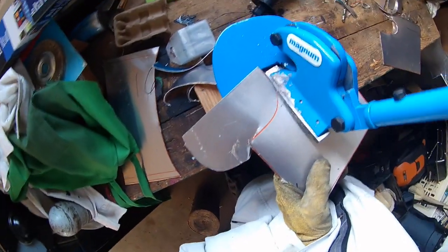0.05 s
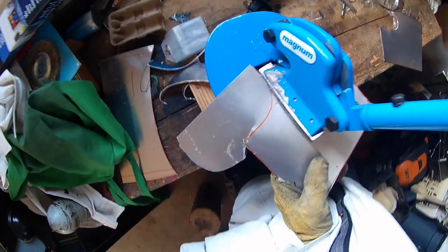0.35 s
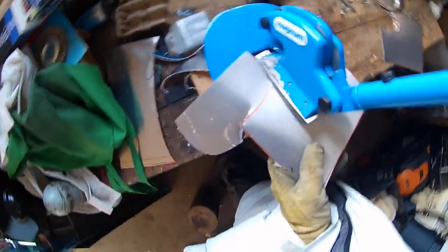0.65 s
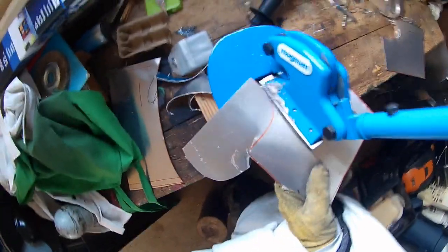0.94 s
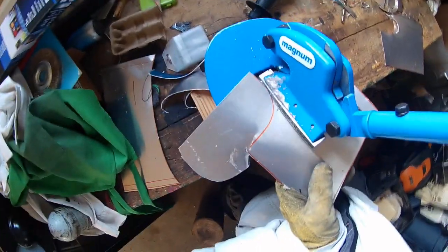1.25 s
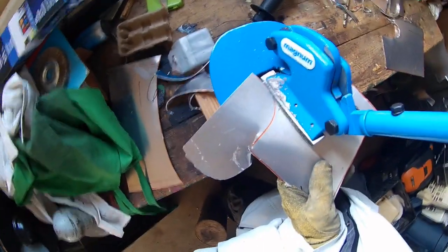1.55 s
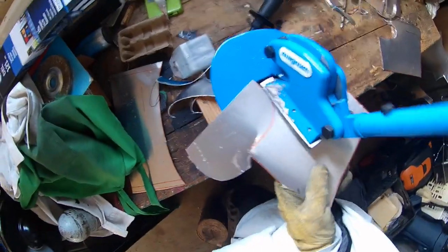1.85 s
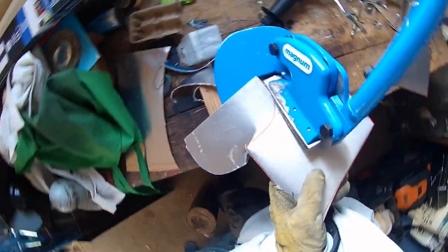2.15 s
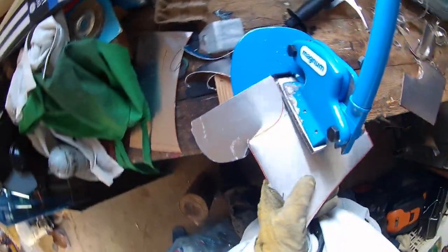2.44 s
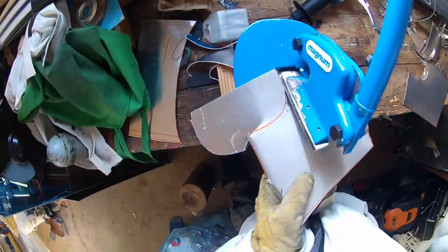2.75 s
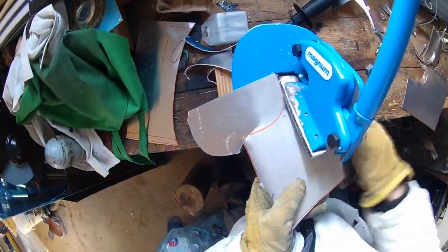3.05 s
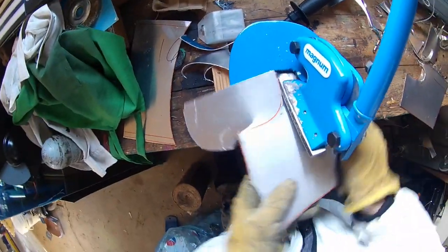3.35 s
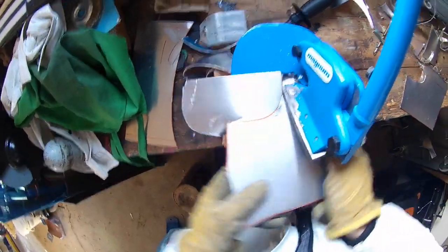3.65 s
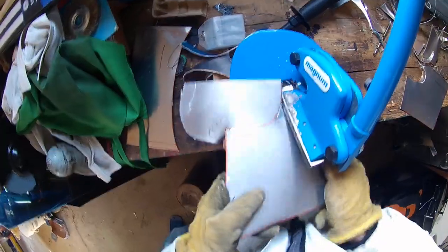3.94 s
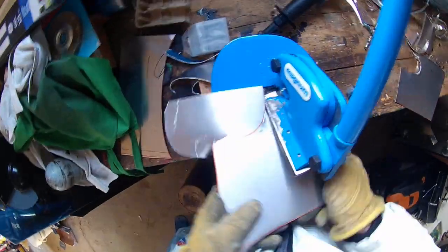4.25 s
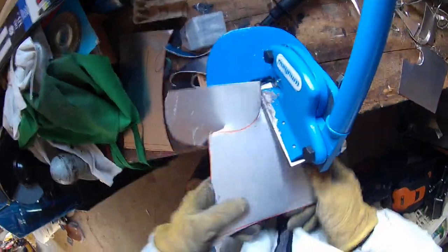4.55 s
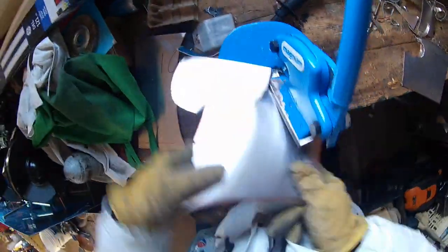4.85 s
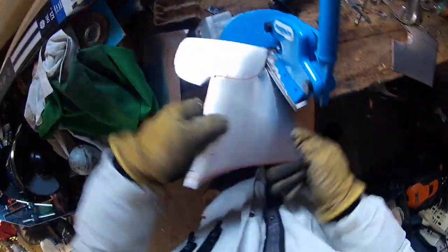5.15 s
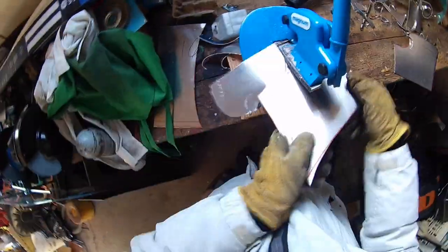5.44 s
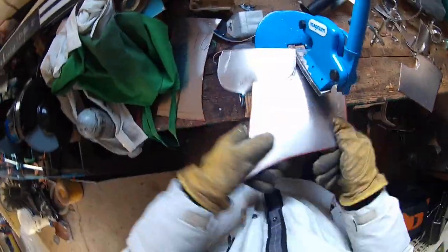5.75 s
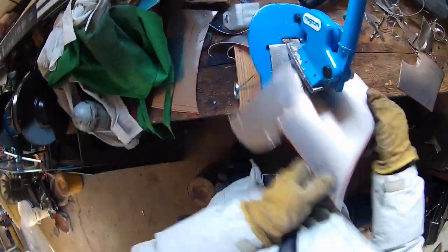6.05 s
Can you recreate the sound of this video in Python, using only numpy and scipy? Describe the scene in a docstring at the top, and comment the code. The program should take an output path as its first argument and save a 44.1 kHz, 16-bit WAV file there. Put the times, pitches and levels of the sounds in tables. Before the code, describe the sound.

A lever shear cuts sheet metal with one loud ringing clack, then the sheet clicks and scrapes lightly against the blades.

```python
"""A lever shear, mounted on a bench, cuts a steel sheet in a small workshop with a low rumble and hiss.
First the lever's strokes make the bench thud, and at 0.5 s the blade bites with a faint crack and scrape.
At about 1.25 s the metal parts with one loud clack that rings the shear's frame and jolts the bench.
From 1.8 s on, the sheet is turned by hand and clicks and scrapes against the blades.
Early among these clicks, at 2 s, the lever thuds the bench once more."""
import sys
import numpy as np
from scipy import signal
from scipy.fft import rfft, irfft
from scipy.io import wavfile

SR = 44100
rng = np.random.default_rng(int(sys.argv[2]) if len(sys.argv) > 2 else 0)


def generate_wav(sig):
    """Save sig (samples, or channels by samples) to the path in sys.argv[1] as 16-bit PCM at SR."""
    pcm = np.round(np.clip(np.atleast_2d(sig).T, -1, 1) * 32767).astype(np.int16)
    wavfile.write(sys.argv[1], SR, pcm)


N = 276948
AGE = np.arange(SR // 3) / SR   # seconds since a sound began

# steady noise of the workshop: pitch_hz, level_db
HISS_SPECTRUM = [(53, -8.5), (90, -4), (114, -8), (142, -8), (296, -8.5), (591, -14), (644, -14),
                 (1060, -18), (1210, -17), (1340, -19), (4410, -27), (12200, -31.5), (15800, -34)]
# deep rumble of body movement: pitch_hz, level_db
RUMBLE_SPECTRUM = [(2, -25), (8, -1.5), (14, -2), (25, -17), (40, -19), (60, -27), (100, -27),
                   (200, -37), (1000, -100)]
# the lever pushes on the bench: start_s, knock_db, pitch_hz, sway_db
LEVER_STROKES = [(0.143, -27, 71.4, -37), (0.490, -21, 95, -9), (0.812, -31.5, 64.5, -45),
                 (0.864, -26.5, 60, -15.5), (1.997, -33, 88, -22)]
# the bench springs back after the cut: pitch_hz, level_db, swell_s
BENCH_RECOIL = [(86, -12, .015), (296, -34, 0.015)]
# the blade breaks through the metal: start_s, level_db, dull_above_hz, grind_s
BLADE_BREAKS = [(0.494, -45, 4000, .01), (0.507, -50, 6960, 0.014), (0.527, -54, 7000, .018),
                (1.2332, -42, 5000, 0.013), (1.2473, -24, 4470, 0.0099), (1.2543, -26, 4830, 0.017),
                (1.268, -35, 3800, 0.025)]
# short tones of blade and sheet that give a crack its body: pitch_hz, level_db, ring_s
CRACK_TONES = [(490, -19, 0.04), (760, -18, 0.033), (920, -7, 0.013), (1150, 2, 0.047), (1295, 2.5, 0.073),
               (1670, -4, 0.034), (1890, -9, .03), (2300, -9, 0.021), (2590, -9, 0.052), (3230, -29, 0.018),
               (3770, -28, 0.015), (4930, -23, 0.038)]
# grit of the parting metal: pitch_hz, level_db
GRIT_SPECTRUM = [(150, -16), (300, -7), (450, -6.5), (850, 1), (1280, 11), (1900, -4), (2700, -9.5),
                 (4000, -20.5), (5200, -36), (7000, -40), (15000, -38)]
# tones of the shear's frame with the sheet clamped in it: pitch_hz, level_db, ring_s
FRAME_TONES = [(660, -19, 0.17), (1071, 8, 0.13), (1109, -12, 0.14), (1115, -2, 0.058), (1316, 5, 0.15),
               (1374, 1, 0.28), (1560, -15, .18), (1561, -15, 0.18), (1655, -4, 0.12), (1790, -7, 0.16),
               (1926, -7, 0.14), (1800, -13, 0.28), (2130, -7, 0.16), (2450, -15, 0.24), (2480, -15, 0.11),
               (2770, -25, 0.092), (3420, -13, 0.15), (5130, -28, .08)]
# hum of the sheet after a crack: pitch_hz, level_db
HUM_SPECTRUM = [(200, 3), (800, -10.5), (1150, -9), (1500, -0.5), (2000, -4.5), (2600, -5),
                (4000, -4), (9000, -21)]
# an edge drags along the blade: start_s, level_db, length_s, dull_above_hz, favoured_hz
EDGE_DRAGS = [(0.501, -52.5, .022, 6040, 2577), (2.359, -47.5, .026, 5000, 1377),
              (2.384, -40, 0.019, 2500, 768), (2.403, -48.5, 0.027, 3200, 2577),
              (3.346, -57, 0.062, 4500, 2800), (4.893, -52, 0.019, 2500, 1580),
              (6.038, -44.5, 0.019, 6000, 3700), (6.077, -41.5, 0.031, 3520, 940),
              (6.098, -42, 0.03, 11000, 1830), (6.253, -43, 0.024, 4000, 2577)]
# tick of the sheet's edge: pitch_hz, level_db
TICK_SPECTRUM = [(200, -2), (450, -1.5), (800, 8), (1600, 6.5), (2150, -1.5), (3000, -2), (5000, -2),
                 (6500, -7.5), (8000, -13), (10000, -8), (11500, -21), (15000, -20)]
# tones of the loose sheet: pitch_hz, level_db, ring_s
SHEET_TONES = [(312, -1.5, 0.085), (623, 0, 0.069), (766, 1, 0.069), (867, -16, 0.089), (950, -12.5, 0.037),
               (1085, 2.5, 0.032), (1237, -0.5, 0.073), (1362, 6, 0.051), (1610, -2, 0.08),
               (1677, 2, 0.044), (1684, -5, 0.063), (1833, 1.5, 0.061), (1952, -5, 0.06),
               (2360, -11, 0.062), (2430, -1.5, 0.044), (2586, 0, 0.05), (2780, -6, 0.031),
               (3136, -4, 0.038), (3460, -1.5, 0.029), (3680, -6, 0.037), (4440, -27, 0.075),
               (4580, -9, 0.073), (5050, -5.5, 0.039), (5680, -6.5, 0.029), (6315, -7.5, 0.033),
               (7040, -9, 0.023), (9700, -3, 0.046), (10200, -11, 0.041)]
# the loose sheet touches the blades: start_s, level_db, hollow_db, bright_db, sizzle_db, middle_hz, high_hz
# (hollow, bright and sizzle adjust the bands below; the spot touched favours the two pitches)
SHEET_TAPS = [(1.8404, -40.5, -16, -19, -26, 1310, 3420), (1.923, -43, -3.5, -16, -20, 1180, 3530),
              (1.9929, -49, 1.5, -17, -15, 1190, 3810), (2.371, -42, -3, -5.5, -14, 1350, 4590),
              (2.3994, -35, -4.5, -2.5, -27, 1040, 2740), (2.4159, -42, -5, -5, -22, 1140, 2760),
              (2.8049, -31.5, -6, -10, -32, 1724, 3140), (2.8774, -45.5, -3, -9, -17, 1340, 2800),
              (3.1766, -39, -4.5, -7.5, -23, 1630, 2760), (3.342, -39, -2, -10, -24, 1370, 3050),
              (3.6509, -43, -4.5, -0.5, -17, 1400, 4900), (4.019, -45, -6, -14, -18, 1250, 3450),
              (4.3078, -30, -9.5, -9.5, -27, 1670, 5060), (4.6583, -42.5, -2.5, -24, -23, 1090, 4620),
              (4.8794, -41.5, 0, -17, -19, 1330, 3060), (4.9008, -37.5, -14, -16, -18, 1290, 3040),
              (5.3366, -41, -18, -16, -22, 1650, 3600), (5.4795, -30, -5.5, 2, -11, 1806, 6330),
              (5.6287, -46.5, 0.5, -14, -16, 1190, 3250), (5.7356, -37.5, -6, -10, -24, 1240, 3290),
              (6.0355, -27, -24, -4, -30, 1860, 3630), (6.0727, -36.5, -3, -9, -17, 1080, 2750),
              (6.1015, -29.5, -7.5, -2, -7.5, 1820, 3760), (6.1717, -39, -18, -12, -18, 1270, 3540),
              (6.2451, -25.5, -14.5, -7.5, -22.5, 1940, 3300)]
# the clank, hollow, bright and sizzle bands of a tap: low_hz, high_hz, level_db
TAP_BANDS = [(1100, 2400, -8.5), (300, 1100, -5.5), (2400, 7000, -8), (7500, 16000, -10.5)]


def from_db(db):
    """Turn decibels into a number to multiply by."""
    return 10 ** (np.asarray(db) / 20)


def unit_energy(x):
    """Scale a sound so that its squared samples add up to one."""
    return x / np.sqrt(np.sum(x ** 2) + 1e-20)


def unit_attack(x):
    """Scale a sound to a power of one over its first 20 ms."""
    return x / np.sqrt(np.mean(x[:SR // 50] ** 2) + 1e-20)


def filtered(x, hz, kind, order=2):
    """Keep the lows or one band of a sound; a higher order cuts more steeply."""
    return signal.sosfilt(signal.butter(order, hz, kind, fs=SR, output="sos"), x)


def noise(spectrum, size):
    """Noise with a power of one, coloured by a spectrum table."""
    hz, db = np.transpose(spectrum)
    bins_hz = np.maximum(np.fft.rfftfreq(size, 1 / SR), 1)
    gains = from_db(np.interp(np.log(bins_hz), np.log(hz), db))
    coloured = irfft(rfft(rng.standard_normal(size)) * gains, size)
    return unit_energy(coloured) * np.sqrt(size)


def fade(ring_s):
    """A fade that drops by 60 dB in ring_s."""
    return from_db(-60 * AGE / ring_s)


def add(track, start_s, sound):
    """Mix a sound into the track at start_s."""
    start = round(start_s * SR)
    track[start:start + len(sound)] += sound[:N - start]


def background(hiss_db=-51.5, rumble_db=-38.5):
    """The room hisses steadily over a deep rumble of body movement."""
    rumble = from_db(rumble_db) * noise(RUMBLE_SPECTRUM, N)
    return rumble + from_db(hiss_db) * noise(HISS_SPECTRUM, N)


def jolt(hz, swell_s, steepness=2.6):
    """A jolt swells and dies within a few slow swings."""
    swell = (AGE / swell_s * np.exp(1 - AGE / swell_s)) ** steepness
    return swell * np.sin(2 * np.pi * hz * AGE)


def bench_thuds(sway_lag_s=0.0186, sway_pitch_ratio=0.37, give_way_s=1.2305, recoil_lag_s=0.00834):
    """Each stroke knocks, then sways the heavy bench; when the metal gives way it dips and springs back."""
    out = np.zeros(N)
    for start_s, knock_db, hz, sway_db in LEVER_STROKES:
        add(out, start_s, from_db(knock_db) * jolt(hz, swell_s=0.015))
        add(out, start_s + sway_lag_s, from_db(sway_db) * jolt(hz * sway_pitch_ratio, swell_s=0.017))
    dip = from_db(-5.5) * jolt(hz=51.6, swell_s=0.016, steepness=2.8)
    add(out, give_way_s, dip)
    for hz, db, swell_s in BENCH_RECOIL:
        add(out, give_way_s + recoil_lag_s, from_db(db) * jolt(hz, swell_s))
    return out


def ring(tones, spread_db):
    """Struck metal rings in fading tones; their strength and sign vary with where the blow lands."""
    out = np.zeros(len(AGE))
    for hz, db, ring_s in tones:
        strength = from_db(db + spread_db * rng.normal()) * rng.choice([-1, 1])
        out += strength * fade(ring_s) * np.sin(2 * np.pi * hz * AGE)
    return out


def shear_cracks():
    """The metal gives way in a few quick steps: each is a blunt, gritty crack that rings the frame."""
    out = np.zeros(N)
    for start_s, db, dull_above_hz, grind_s in BLADE_BREAKS:
        crack = unit_attack(ring(CRACK_TONES, spread_db=3.5))
        grit = unit_attack(noise(GRIT_SPECTRUM, len(AGE)) * np.exp(-AGE / grind_s))
        frame = unit_attack(ring(FRAME_TONES, spread_db=2.5))
        step = from_db(-6) * crack + from_db(-5.5) * grit + from_db(-14.5) * frame
        add(out, start_s, from_db(db) * filtered(step, dull_above_hz, "low", order=3))
    return out


def sheet_hum(cracks, build_s=0.022):
    """After each crack, the sheet's many bending tones blur into a smooth hum."""
    tail = noise(HUM_SPECTRUM, len(AGE)) * fade(ring_s=0.24) * (1 - np.exp(-AGE / build_s))
    return signal.fftconvolve(cracks, unit_energy(tail))[:N]


def room_echo(sound, dull_above_hz=5000, build_s=0.0056):
    """Cluttered walls send back a short, dull, blurred echo."""
    dull_noise = filtered(rng.standard_normal(len(AGE)), dull_above_hz, "low")
    tail = dull_noise * fade(ring_s=0.43) * (1 - np.exp(-(AGE / build_s) ** 2))
    return signal.fftconvolve(sound, unit_energy(tail))[:N]


def slips(length_s, slips_per_s=2500):
    """A dragging edge moves in many tiny random slips that swell and fade."""
    swell = np.sin(np.pi * np.minimum(AGE / length_s, 1))
    slipping = rng.random(len(AGE)) < slips_per_s / SR
    return unit_energy(swell * slipping * rng.standard_normal(len(AGE)))


def sheet_ring(favoured_hz, boost_db=13.5, grip_detune=0.013):
    """The spot touched boosts the tones near its favoured pitches; the changing grip detunes the rest."""
    hz, db, ring_s = np.transpose(SHEET_TONES)
    nearness = np.max([np.exp(-(np.log(hz / pitch) / 0.045) ** 2) for pitch in favoured_hz], axis=0)
    shift = 1 + grip_detune * (1 - nearness) * rng.standard_normal(len(hz))
    tones = zip(hz * shift, db + boost_db * nearness, ring_s)
    return unit_attack(ring(tones, spread_db=1.5))


def edge_scrapes():
    """As an edge drags along the blade, every tiny slip ticks and rings the sheet."""
    out = np.zeros(N)
    for start_s, db, length_s, dull_above_hz, favoured_hz in EDGE_DRAGS:
        tick = unit_attack(noise(TICK_SPECTRUM, len(AGE)) * fade(ring_s=0.024))
        drag = slips(length_s)
        one_slip = tick + from_db(-1.5) * sheet_ring([favoured_hz], boost_db=18)
        scrape = filtered(signal.fftconvolve(drag, one_slip), dull_above_hz, "low")
        add(out, start_s, from_db(db) * unit_energy(scrape) * np.sqrt(length_s * SR))
    return out


def edge_click(level_db, colour_db, favoured_hz, contact_s=0.004, rebound_s=0.0087):
    """The edge ticks against a blade, rings the glove-damped sheet and skids on."""
    contact_and_rebound = np.exp(-AGE / contact_s) + from_db(-4) * np.exp(-AGE / rebound_s)
    tick = unit_attack(noise(TICK_SPECTRUM, len(AGE)) * contact_and_rebound)
    rise_s = 0.00038 * 2 ** ((-29.5 - level_db) / 9)   # a touch 9 dB lighter rises twice as slowly
    hit = (from_db(-5.5) * tick + sheet_ring(favoured_hz)) * (1 - np.exp(-AGE / rise_s))
    skid = from_db(-8) * signal.fftconvolve(hit, slips(length_s=0.017))[:len(AGE)]
    out = np.zeros(len(AGE))
    for (low_hz, high_hz, band_db), extra_db in zip(TAP_BANDS, [0, *colour_db]):
        band = filtered(hit + skid, [low_hz, high_hz], "band", order=3)
        out += from_db(level_db + band_db + extra_db) * unit_attack(band)
    return out


def sheet_taps(nudge_db=-21):
    """Each tap clicks, and nudges the bench with a soft low knock."""
    out = np.zeros(N)
    for start_s, db, *colour_db, middle_hz, high_hz in SHEET_TAPS:
        click = edge_click(db, colour_db, [middle_hz, high_hz])
        knock = from_db(db + nudge_db) * jolt(hz=280, swell_s=0.0061)
        add(out, start_s, click + knock)
    return out


def scene():
    """The cut and the handled sheet echo in the room, over the bench thuds and the background."""
    cut = shear_cracks()
    handling = sheet_taps() + edge_scrapes()
    hum = from_db(-12) * sheet_hum(cut)
    echo = room_echo(from_db(-18.5) * (cut + handling))
    return (cut + hum + handling + echo + bench_thuds() + background())[None]


def record(dry):
    """The highest treble, above 15900 Hz, is cut off steeply."""
    return signal.sosfilt(signal.ellip(12, 0.1, 90, 15900, fs=SR, output="sos"), dry)


dry = scene()
out = record(dry)
generate_wav(out)
```